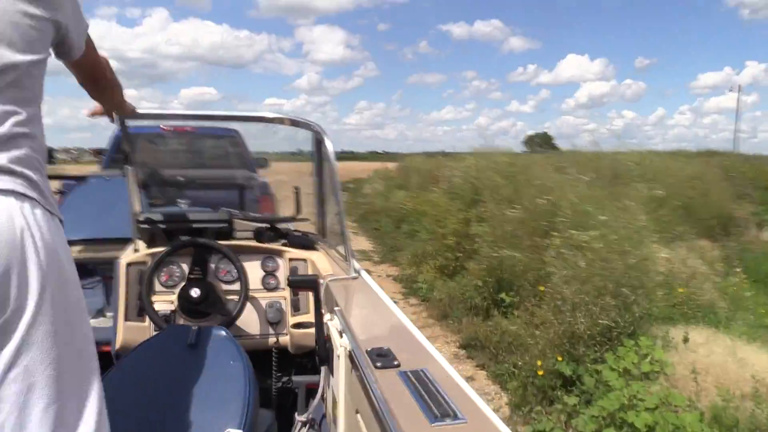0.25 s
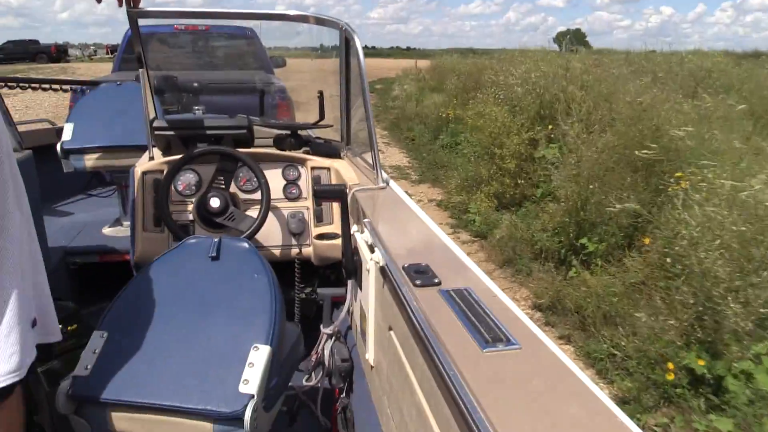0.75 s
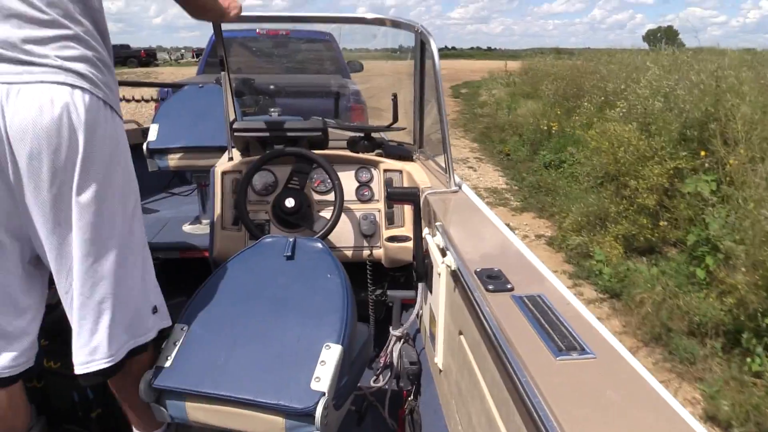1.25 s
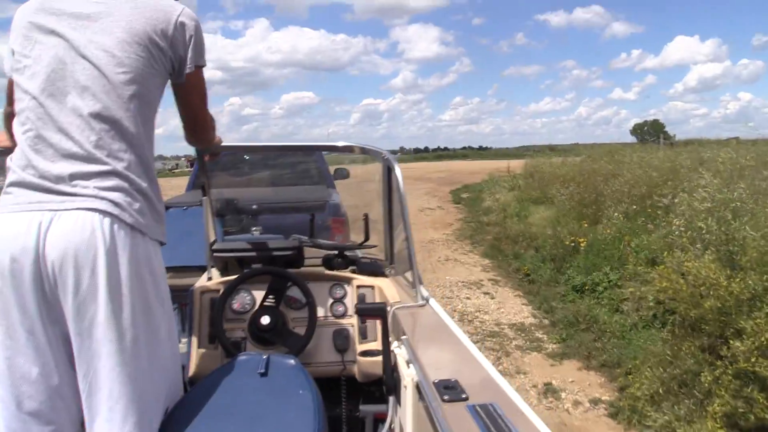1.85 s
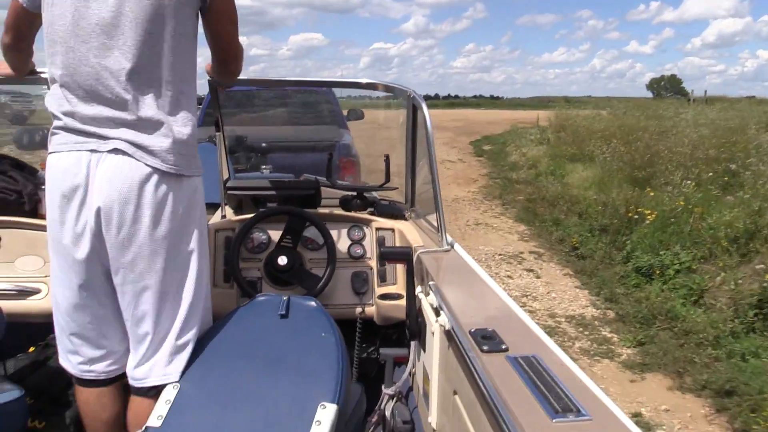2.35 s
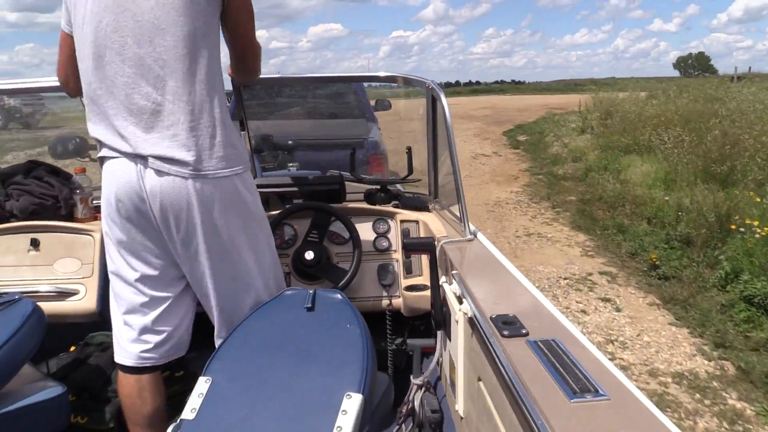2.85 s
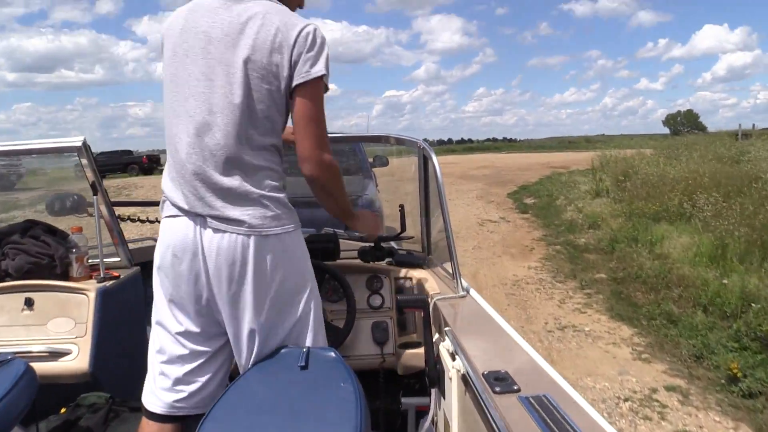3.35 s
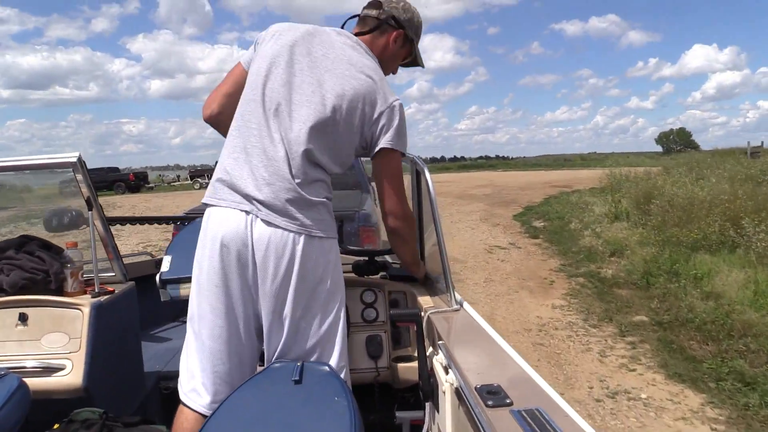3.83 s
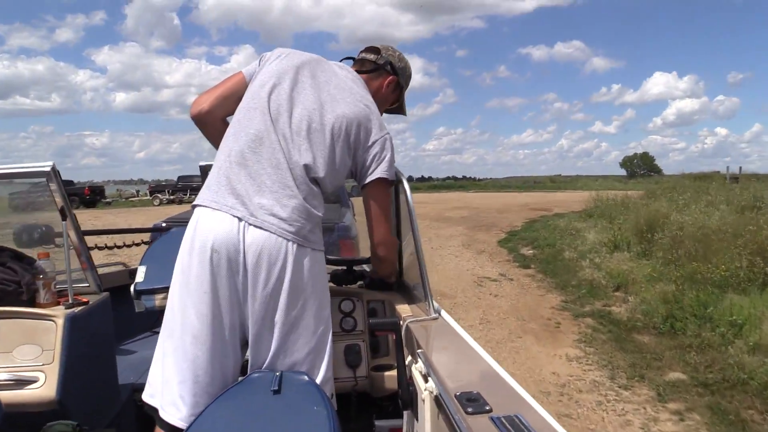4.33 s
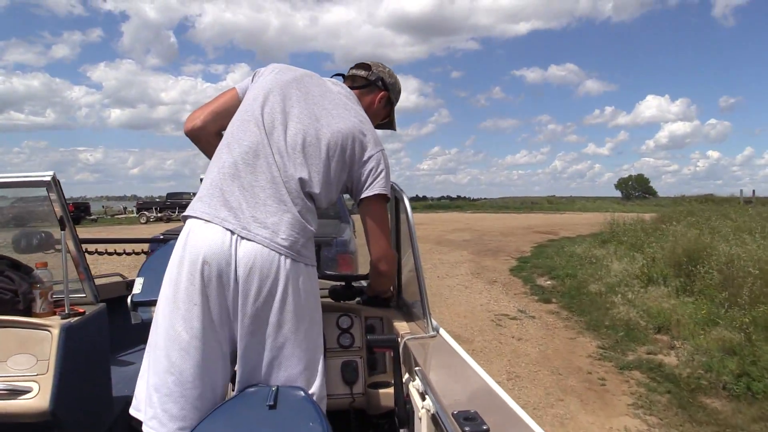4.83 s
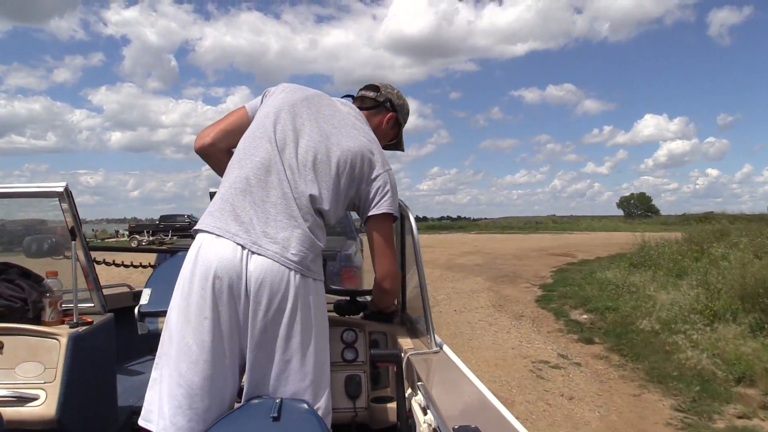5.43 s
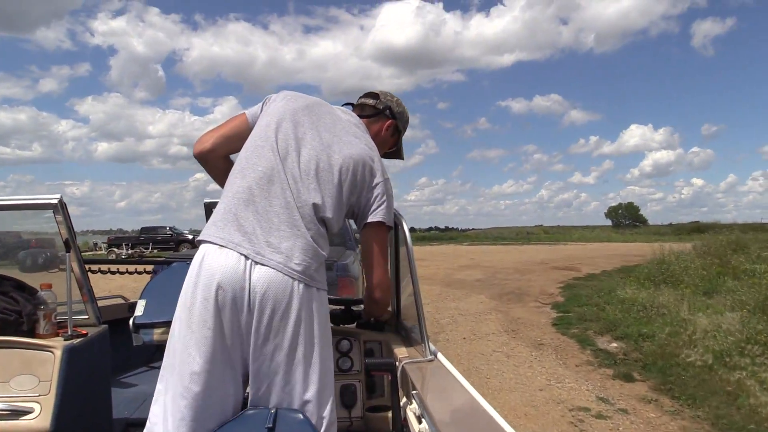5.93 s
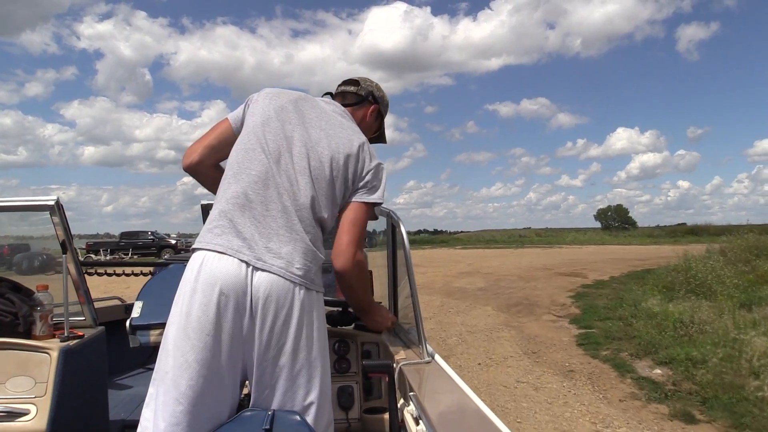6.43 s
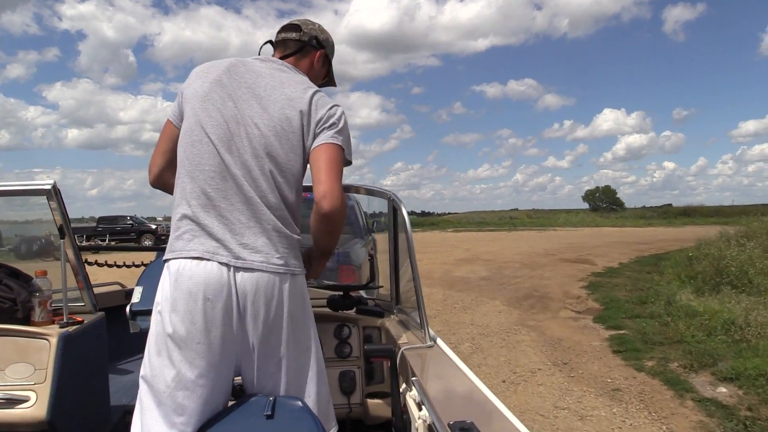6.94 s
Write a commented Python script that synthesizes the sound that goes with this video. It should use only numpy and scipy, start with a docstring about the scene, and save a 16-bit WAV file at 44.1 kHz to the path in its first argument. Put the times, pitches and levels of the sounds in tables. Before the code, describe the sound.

Deep, irregular thumps shake an open boat as its trailer rolls over gravel outdoors, heaviest in the first half. Hollow knocks, small metal clanks and rattles surround the microphone on board, over steady rumble, crunching stones and faint, high insects. Towards the end come a sharp clack and then a loud run of latch snaps. Everything is in the right channel, with only faint hiss on the left.

```python
"""The hull of an open boat booms as its trailer drops over the bumps of a gravel track.
The microphone rides on board: loose gear knocks and rattles around it, and a hand snaps a catch at the console.
Below, the frame drones and the tyres grind stones; farther off, insects rasp their wings in the grass.
The microphone feeds the right channel; the left holds only amplifier hiss and a trace of leaked bass."""
import sys
import numpy as np
from scipy import signal
from scipy.io import wavfile
from scipy.ndimage import uniform_filter1d

SR = 44100
rng = np.random.default_rng(int(sys.argv[2]) if len(sys.argv) > 2 else 0)


def unload_audio(sound):
    """Save the sound as a 16-bit wav file, at the path given as the first command line argument."""
    columns = np.transpose(np.atleast_2d(sound))
    # keep every value between -1 and 1, then stretch to whole-number steps
    steps = np.round(np.clip(columns, -1, 1) * 32767)
    wavfile.write(sys.argv[1], SR, steps.astype(np.int16))


N = 316638


def amp(db):
    """Decibels to gain."""
    return np.exp(np.asarray(db) * np.log(10) / 20)


def unit_rms(x):
    """Scale to rms 1."""
    return x / np.sqrt(np.mean(x ** 2) + 1e-20)


def curves(rows):
    """Columns of a table led by time_s, one value per sample."""
    time_s, *columns = np.transpose(rows)
    return [np.interp(np.arange(N) / SR, time_s, column) for column in columns]


def band(x, low_hz, high_hz):
    """Butterworth band-pass."""
    sos = signal.butter(2, [low_hz, min(high_hz, .45 * SR)], "band", fs=SR, output="sos")
    return signal.sosfilt(sos, x)


def drift(rate_hz):
    """Slow random wander, rms about 1."""
    step = 40
    pole = np.exp(-2 * np.pi * rate_hz * step / SR)
    slow = signal.lfilter([1], [1, -2 * pole, pole * pole], rng.standard_normal(N // step + 2002))[2000:]
    return np.interp(np.arange(N) / step, np.arange(len(slow)), unit_rms(slow))


def ring(drive, hz, t60_s):
    """One resonance: a unit click sets off a dying sine of height 1."""
    r, w = amp(-60 / (t60_s * SR)), 2 * np.pi * hz / SR
    return signal.lfilter([0, np.sin(w)], [1, -2 * r * np.cos(w), r * r], drive + 1e-18)


def coloured(noises, spectrum, flicker_db):
    """Third-octave bands taken in turn from two noises, flickering partly together; rms 1."""
    hz, level_db = np.transpose(spectrum)
    edges_hz = hz[0] * 2 ** np.arange(0, np.log2(hz[-1] / hz[0]), 1 / 3)
    out, together = 0, drift(19)
    for k, low_hz in enumerate(edges_hz):
        gain_db = np.interp(np.log(low_hz * 2 ** (1 / 6)), np.log(hz), level_db)
        wander_db = flicker_db * (2.18 * together + drift(13))
        out += amp(gain_db + wander_db) * band(noises[k % 2], low_hz, low_hz * 2 ** (1 / 3))
    return unit_rms(out)


def evened(x, window):
    """Divide out most of the chance swells of narrow noise; rms 1."""
    envelope = np.sqrt(uniform_filter1d(x ** 2, size=window) + 0.016 * np.mean(x ** 2))
    return unit_rms(x / envelope ** 0.84)


def bursts(starts_s, gains, t60s):
    """Envelope of contacts that close in about a millisecond, each with its own decay."""
    out = np.zeros(N)
    for start_s, gain, t60_s in zip(starts_s, gains, t60s):
        start = round(start_s * SR)
        t = np.arange(min(N - start, SR // 5)) / SR
        out[start:start + len(t)] += gain * (1 - np.exp(-t / 0.00078)) * amp(-60 * t / max(t60_s, .003))
    return out


def swell(start_s, attack_s, hold_s, t60_s, level_db):
    """Gain of a sound that rises, holds and fades."""
    out, start = np.zeros(N), round(start_s * SR)
    t = np.arange(min(N - start, round((attack_s + hold_s + t60_s) * SR))) / SR
    fade_db = 60 * np.maximum(t - attack_s - hold_s, 0) / t60_s
    out[start:start + len(t)] = np.minimum(t / attack_s, 1) * amp(level_db - fade_db)
    return out


# The insect choir, off in the grass: time_s, level_db, throb_depth (0-1)
INSECT_LEVELS = [(0.0, -50, 0.34), (0.2, -60.5, 0.42), (1.4, -50.5, 0), (1.8, -55, 0.44), (2.3, -50, 0.43),
                 (2.7, -51, 0.42), (3.0, -50.5, 0.64), (3.7, -55.5, 0.8), (3.95, -52.5, 0.43),
                 (5.2, -52.5, 0.3), (7.18, -52.5, 0.3)]
# Resonances of its song: pitch_hz, width_hz, gain_db, lag_rad
WING_RESONANCES = [(7980, 260, -6, 5), (8290, 210, -2, -0.1), (8540, 250, -7, .5), (8790, 250, -5.5, 2.5),
                   (9090, 260, -5, 5)]


def insects(throb_hz=21):
    """Wings rasp in pulses that sweep through a few high resonances."""
    level_db, depth = curves(INSECT_LEVELS)
    phase = 2 * np.pi * throb_hz * np.arange(N) / SR + 2.8 * drift(1)
    choir = 0
    for hz, width_hz, gain_db, lag_rad in WING_RESONANCES:
        throb = amp(11 * depth * np.sin(phase - lag_rad + 0.85 * drift(4.4)))
        narrowing = amp(-9 * (1 - depth) * abs(hz - 8700) / 500)   # a smooth, far choir sounds narrower
        rasp = band(rng.standard_normal(N), hz - width_hz / 2, hz + width_hz / 2)
        choir += amp(gain_db) * narrowing * throb * rasp
    return amp(level_db) * unit_rms(choir)


def cricket(pitch_hz=5060):
    """One cricket nearer the track rubs out a thinner, lower chirp."""
    chirp = band(rng.standard_normal(N), pitch_hz - 60, pitch_hz + 60) * amp(3 * drift(15))
    return swell(start_s=1.75, attack_s=.15, hold_s=1.05, t60_s=.4, level_db=-61) * unit_rms(chirp)


# The trailer rolling, below the microphone: time_s, drone_db, gravel_db
ROLLING_LEVELS = [(0.0, -25.5, -35.5), (0.3, -22, -39), (1.25, -24.5, -40), (1.9, -20.5, -36.5),
                  (2.4, -23.5, -38.5), (3.3, -22.5, -38), (4.4, -21, -39.5), (5.4, -22, -38),
                  (6.1, -23.5, -38.5), (7.18, -20.5, -39)]
# Spectrum of the frame: frequency_hz, density_db
FRAME_SPECTRUM = [(59, -1), (100, -9), (155, -7), (239, -14.5), (274, -11), (323, -15.5), (426, -17),
                  (457, -32), (550, -23), (663, -21.5), (807, -15.5), (928, -34), (1600, -52)]
# Spectrum of the stones: frequency_hz, density_db
GRAVEL_SPECTRUM = [(600, -3), (950, -9), (1300, -2.5), (1900, -3), (2500, -5.5), (3200, -11), (4600, -17),
                   (6400, -24.5), (9500, -28), (15500, -33)]


def rolling():
    """The frame drones on the rough track; stones grind under the tyres as dense grains on hiss."""
    drone_db, gravel_db = curves(ROLLING_LEVELS)
    drone = coloured(rng.standard_normal((2, N)), FRAME_SPECTRUM, flicker_db=.9)
    struck = rng.random((2, N)) < 700 * amp(3 * drift(25)) / SR
    force = amp(7.7 * np.minimum(rng.exponential(1, (2, N)), 5))
    crunch = signal.lfilter([1], [1, -.985], struck * force)   # each stone grinds for a few milliseconds
    stones = rng.standard_normal((2, N)) * (1 + .5 * unit_rms(crunch))
    return amp(drone_db) * drone + amp(gravel_db) * coloured(stones, GRAVEL_SPECTRUM, flicker_db=.7)


def cloth_brush():
    """Cloth sweeps once over the seat: a soft, uneven hiss."""
    rub = rng.standard_normal(N)
    broad = unit_rms(band(band(rub, 2500, 10800), 2000, 13000))
    cloth = (broad + 0.51 * unit_rms(band(rub, 3600, 4800))) * amp(2 * drift(43))
    return swell(start_s=3.868, attack_s=.02, hold_s=.025, t60_s=.4, level_db=-39.5) * cloth


# Small bright ticks: start_s, level_db
TICK_TIMES = [(2.813, -16), (3.1373, -19), (3.277, -28), (3.3853, -23), (4.2128, -26), (4.502, -22),
              (4.558, -25), (5.1517, -28), (5.2847, -18), (5.948, -27), (6.266, -28)]


def ticks():
    """Each tick is a few milliseconds of treble noise."""
    start_s, level_db = np.transpose(TICK_TIMES)
    envelope = bursts(start_s, amp(level_db), t60s=np.full(len(start_s), .008))
    return band(envelope * rng.standard_normal(N), 2700, 10200)


# Loose fittings rattling on board: start_s, attack_s, hold_s, t60_s, level_db
FITTING_RATTLES = [(0.141, .005, 0.024, 0.13, -35), (0.68, 0.0025, 0.0067, 0.046, -35.5),
                   (2.033, .008, 0.017, .1, -33), (2.13, 0.0074, .015, .1, -35),
                   (2.201, .003, 0.014, 0.14, -36), (4.36, .01, 0.029, 0.082, -38.5),
                   (4.85, 0.025, 0.025, 0.13, -33.5), (5.437, .01, .03, .1, -59)]


def rattles():
    """Many tiny contacts in quick succession: bright noise that comes in lumps."""
    chatter = band(rng.standard_normal(N), 1130, 3470) * amp(3.5 * drift(110))
    return sum(swell(*row) for row in FITTING_RATTLES) * unit_rms(chatter)


# Single fittings that clank clear of the rest: start_s, level_db, pitch_hz, t60_s
FITTING_CLANKS = [(0.542, -31.5, 2340, 0.42), (1.963, -16.5, 2360, 0.062), (2.045, -27, 2650, 0.074),
                  (5.286, -23.5, 3040, 0.033), (6.675, -18.5, 3190, 0.035)]


def clanks():
    """A struck fitting rings roughly: noise in one narrow resonance, dying away."""
    out, noise = 0, rng.standard_normal(N)
    for start_s, level_db, pitch_hz, t60_s in FITTING_CLANKS:
        resonance = unit_rms(band(noise, .9 * pitch_hz, 1.1 * pitch_hz))
        out += bursts([start_s], [amp(level_db)], [t60_s]) * resonance
    return out


# Catch and lid at the console: start_s, crack_db, thud_re_crack_db, snap_re_crack_db, crack_t60_s
CATCH_CLACKS = [(0.132, -15.5, -1.5, -4.5, 0.13), (4.9678, -6.5, -2.5, -44, 0.047),
                (4.99, -24, 10, -30, 0.054), (5.025, -13.5, 13, -32, 0.042), (5.9591, -6.5, -29, 5, 0.09),
                (5.9723, -18, 1, -6, 0.03), (5.9911, -1.5, 2.5, -10, 0.043), (5.9997, 3.5, -14, 8.5, 0.028),
                (6.013, -8.5, -24, -24, 0.066), (6.037, -8, -6.5, 4.5, 0.078), (6.0633, -8, 0, 8, 0.041),
                (6.078, -12, -2, 11, 0.04), (6.0907, -13, -5.5, 3, 0.03), (6.098, -21, -16, 6, 0.039),
                (6.1074, -27, 5, 11, 0.039), (6.314, -2, -3, 3, 0.033), (6.332, -14.5, 2, 0, 0.12),
                (6.3586, 0, -6.5, 2, 0.067), (6.3902, -10.5, -16, 1.5, 0.077),
                (6.4204, -25, -4, -16, 0.036), (6.4301, -8.5, -2, -2, 0.031),
                (6.4991, -18.5, 10, -26, 0.031)]
# Modes of the catch: pitch_hz, gain_db, t60_s
CATCH_MODES = [(433, -8, 0.072), (720, 8, 0.015), (870, -17, 0.15), (1590, -40, 0.017), (1785, -4, 0.036),
               (1875, 2, 0.055), (2480, -5.5, 0.14), (3700, -11, 0.017), (5150, -6, 0.049),
               (6270, -13, 0.1), (7930, -6, .015), (8400, -7, 0.0073), (8730, 2, 0.0051), (9150, -5, .02),
               (12200, -15, .07)]


def console_catch():
    """Plastic and metal parts snap together: noise in three ranges that also rings the catch."""
    start_s, crack_db, thud_db, snap_db, t60_s = np.transpose(CATCH_CLACKS)
    thud = bursts(start_s, amp(crack_db + thud_db), 2.29 * t60_s) * rng.standard_normal(N)
    crack = bursts(start_s, amp(crack_db), t60_s) * rng.standard_normal(N)
    snap = bursts(start_s, amp(crack_db + snap_db), 0.33 * t60_s) * rng.standard_normal(N)
    out = amp(8.5) * band(thud, 330, 1020) + amp(5) * band(crack, 990, 3470)
    out += amp(-2) * band(snap, 5500, 10000)
    for hz, gain_db, ring_s in CATCH_MODES:
        drive = thud if hz < 1000 else crack if hz < 5000 else snap + .1 * crack
        out += amp(gain_db - 34) * ring(drive, hz, ring_s)
    # a hiss with a metallic edge lingers after the busiest run of clacks
    noise = rng.standard_normal(N)
    hiss = unit_rms(band(noise, 5700, 9800)) + .5 * unit_rms(band(noise, 5150, 5700))
    return out + swell(start_s=6.08, attack_s=.03, hold_s=.07, t60_s=.3, level_db=-46) * hiss


def jiggles(per_s=18, level_db=-31):
    """Small chance knocks between the loud ones, as rows like those of GEAR_KNOCKS."""
    gap, force, pitch, jingle = rng.random((400, 4)).T
    start_s = np.cumsum(-np.log(1 - gap)) / per_s
    centre_hz = 420 * 2 ** (1.456 * pitch)
    rows = np.transpose([start_s, level_db + 9 * (force - .5), centre_hz, -30 + 14 * jingle])
    return list(rows[start_s < N / SR])


# Loose gear hitting the hull around the microphone: start_s, level_db, centre_hz, fittings_re_level_db
GEAR_KNOCKS = [(0.179, -17.5, 715, -24), (0.197, -8.5, 385, -21), (0.353, -10.5, 785, -24),
               (0.361, -16.5, 560, -30), (0.412, -26, 900, -8), (0.426, -22.5, 885, -25),
               (0.443, -18.5, 875, -20), (0.539, -23.5, 800, -3.5), (0.649, -20.5, 414, -38),
               (0.683, -24.5, 676, -11), (0.716, -7.5, 460, -35), (1.059, -24.5, 990, -33),
               (1.074, -22, 870, -36), (1.297, -35, 406, 0), (1.349, -17.5, 560, -35),
               (1.476, -23, 880, -13), (1.533, -21, 800, -33), (1.605, -20, 910, -23),
               (1.675, -19, 447, -13), (1.723, -16.5, 905, -14), (1.771, -21.5, 810, -19),
               (1.918, -22, 516, -33), (1.961, -21.5, 1000, 0), (2.025, -18.5, 580, -24),
               (2.135, -25.5, 789, -13), (2.177, -10, 820, -25), (2.216, -20, 407, -21),
               (2.396, -23, 705, -18), (2.555, -20.5, 686, -30), (2.611, -21.5, 560, -35),
               (2.652, -21.5, 1410, -29), (2.674, -19.5, 786, -28), (2.732, -24, 816, -32),
               (2.982, -23, 840, -15), (3.075, -20, 390, -13.5), (3.938, -24, 573, -7.5),
               (4.311, -17, 404, -13), (4.398, -13.5, 620, -12.5), (4.46, -18, 920, -43),
               (4.472, -23.5, 900, -40), (4.603, -18.5, 457, -15.5), (4.889, -36, 490, 3),
               (5.088, -29.5, 810, -5), (5.285, -28.5, 570, 4.5), (5.349, -38, 930, 3),
               (5.449, -23.5, 754, -15), (5.468, -25, 472, -8), (5.499, -16.5, 620, -12.5),
               (5.568, -18, 700, -15), (6.267, -14.5, 390, -39), (7.023, -24, 423, -33),
               (7.089, -27, 910, -11), (7.129, -16.5, 706, -32)]
# Modes of the hull panels: pitch_hz, gain_db
PANEL_MODES = [(330, 2.5), (410, 8), (490, 2.5), (580, 1.5), (680, -3), (790, 6), (900, 2), (1030, 1),
               (1200, 2), (1450, 8.5), (1700, -16)]
# Modes of the loose fittings: pitch_hz, gain_db
FITTING_MODES = [(1850, 4.5), (2100, 2), (2400, 4), (2650, -0.5), (2950, -13), (3300, -7.5), (3750, -15),
                 (4300, -11), (5000, -12.5)]


def gear_knocks(panel_t60_s=0.029):
    """A blow starts the panel modes near its centre pitch, a hollow tock, and jingles the fittings."""
    panel_hz, panel_db = np.transpose(PANEL_MODES)
    fitting_hz, fitting_db = np.transpose(FITTING_MODES)
    hz = np.concatenate([panel_hz, fitting_hz])[:, None]
    is_metal = hz > 1750
    scatter_rad = np.where(is_metal, 3, .7)
    t60_s = panel_t60_s * np.where(is_metal, 1.5, 1)   # metal outlasts the damped panels
    blows = list(GEAR_KNOCKS) + jiggles()
    out, t = np.zeros(N + SR // 5), np.arange(SR // 20) / SR
    for start_s, level_db, centre_hz, jingle_db in blows:
        level_luck, phase_luck = rng.standard_normal((2, len(hz), 1))
        tock_db = panel_db - 18 * np.log2(panel_hz / centre_hz) ** 2
        mode_db = np.concatenate([tock_db, fitting_db + jingle_db])[:, None] + 1.2 * level_luck
        rise_s = 1.078 / centre_hz   # a soft contact: the modes pull together at the top of the push
        envelope = (1 - np.exp(-2 * t / rise_s)) ** 2 * amp(-60 * t / t60_s)
        modes = np.sin(2 * np.pi * hz * (t - rise_s) + scatter_rad * phase_luck)
        start = round(start_s * SR)
        out[start:start + len(t)] += np.sum(amp(level_db + mode_db) * envelope * modes, axis=0)
    return out[:N]


def jolts(peak_s, level_db, hold_s, rise_db_per_s=800, fall_db_per_s=380):
    """Gain over a run of bumps: each swells fast, holds and dies away more slowly."""
    step = 64
    t = np.arange(0, N + step, step) / SR - peak_s[:, None]
    below_db = rise_db_per_s * np.maximum(-t, 0) + fall_db_per_s * np.maximum(t - hold_s[:, None], 0)
    power = np.sum(amp(level_db[:, None] - below_db) ** 2, axis=0)
    return np.interp(np.arange(N) / step, np.arange(len(power)), np.sqrt(power))


# The wheels dropping over bumps in the track: peak_s, level_db, hold_s, heave_re_level_db
TRACK_BUMPS = [(0.0, -11.5, 0.0067, -18), (0.163, -3, 0.046, -4), (0.339, -9, 0.055, -1.5),
               (0.518, -9.5, 0.027, -2), (0.596, -2.5, 0.017, -3), (0.719, -16, 0.023, -16),
               (0.985, -10.5, 0.048, 0.5), (1.183, -21, 0.015, -8), (1.483, -3.5, 0.027, -2),
               (1.686, -7, 0.035, -6), (1.865, -19.5, 0.018, -5), (2.02, -14.5, 0.014, -8),
               (2.159, -5, 0.022, -18), (2.196, -11.5, 0.043, -1.5), (2.488, -15, 0.015, -10),
               (2.564, -3.5, 0.023, -1), (2.984, -13, 0.037, -4), (3.14, -12, 0.032, -1.5),
               (3.278, -15, 0.026, -4), (3.605, -19, 0.057, -6), (3.764, -14, 0.011, -19),
               (3.945, -14.5, 0.017, -2), (4.04, -16.5, .07, -2.5), (4.276, -17.5, 0.1, -18),
               (4.388, -8.5, 0.044, -1.5), (4.509, -13, .02, -10), (4.713, -14, 0.028, -20),
               (4.853, -11, 0.026, -11), (5.113, -14, 0.046, -4), (5.543, -14, 0.034, -17),
               (5.624, -12, 0.015, -10), (5.772, -21, .02, -0.5), (6.067, -16, 0.037, -6),
               (6.306, -33, 0.019, 1), (6.79, -13, 0.015, -19), (6.93, -18.5, 0.014, -4),
               (7.006, -19, 0.026, 0.5)]
# Spectrum of the hull, heard from on board: frequency_hz, density_db
BOOM_SPECTRUM = [(8.8, -0.5), (15, -4), (38, -2), (59, 2), (89, 0.5), (200, -17), (260, -102)]


def hull_boom(split_hz=48, heave_lag_s=0.0096):
    """Bumps and small ruts swing the hull: low noise, a shake with a deep heave just behind it."""
    peak_s, level_db, hold_s, heave_db = np.transpose(TRACK_BUMPS)
    swing = coloured(rng.standard_normal((2, N)), BOOM_SPECTRUM, flicker_db=-0.5)
    heave = signal.sosfilt(signal.butter(4, split_hz, fs=SR, output="sos"), swing)
    shake = signal.sosfilt(signal.butter(4, split_hz, "high", fs=SR, output="sos"), swing)
    ruts = amp(-27 + 3.5 * drift(9.7))
    shake_share = 1 - np.minimum(amp(heave_db) ** 2, .9)   # the power that the heave does not take
    shake_gain = np.hypot(jolts(peak_s, level_db + 10 * np.log10(shake_share), hold_s), ruts)
    heave_gain = np.hypot(jolts(peak_s + heave_lag_s, level_db + heave_db, hold_s), amp(-2.5) * ruts)
    return heave_gain * evened(heave, window=1500) + shake_gain * evened(shake, window=800)


def scene():
    """Everything reaches the one microphone on board, on the right input."""
    boat = hull_boom() + rolling() + gear_knocks() + clanks() + rattles() + console_catch()
    heard = boat + ticks() + cloth_brush() + insects() + cricket()
    return np.array([np.zeros(N), heard])


def record(dry):
    """The live input overloads on the big bumps; its bass leaks, inverted, into the hissing idle input."""
    mic_gain_db, hiss_db, leak_db = 3, -63, -47.5
    leak_hz, cutoff_hz = 40, 15600
    live = amp(mic_gain_db) * dry[1]
    bass = band(np.clip(live, -1.5, 1.5), 10, 160)
    pole = np.exp(-2 * np.pi * leak_hz / SR)
    leak = signal.lfilter([pole - 1], [1, -pole], bass)
    idle = amp(leak_db) * leak + amp(hiss_db) * rng.standard_normal(N)
    both = np.array([idle, np.clip(live, -1, 1)])
    steep_lowpass = signal.ellip(14, .05, 60, cutoff_hz, fs=SR, output="sos")
    return np.clip(signal.sosfilt(steep_lowpass, both), -1, 1)


dry = scene()
out = record(dry)
unload_audio(out)
```